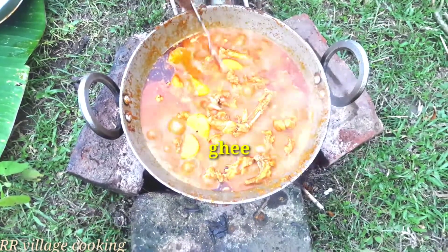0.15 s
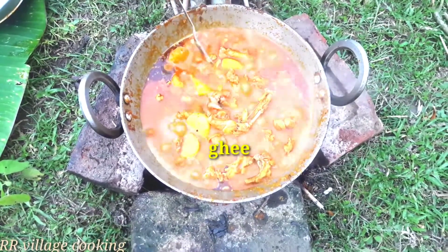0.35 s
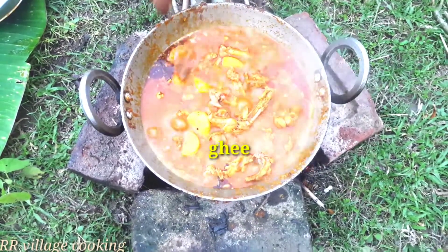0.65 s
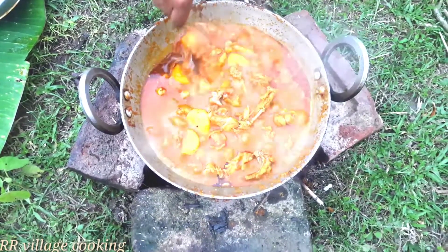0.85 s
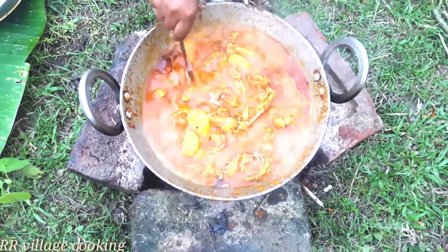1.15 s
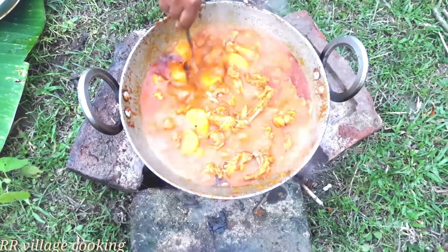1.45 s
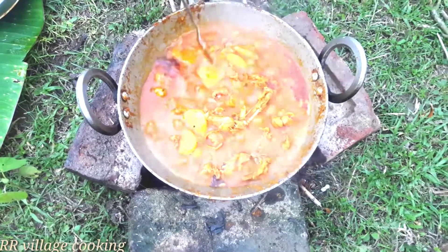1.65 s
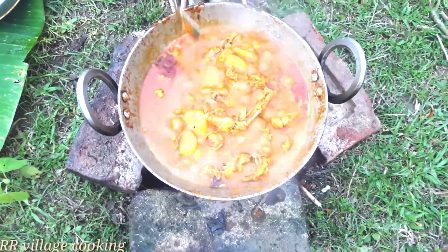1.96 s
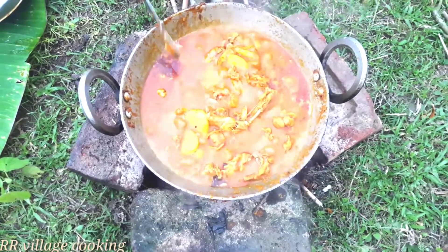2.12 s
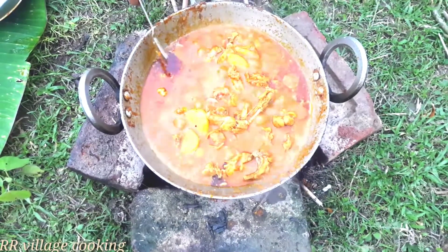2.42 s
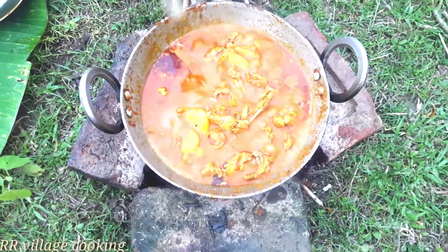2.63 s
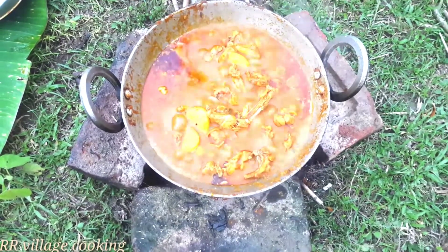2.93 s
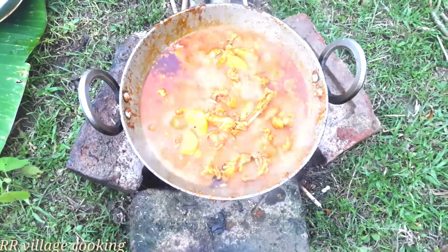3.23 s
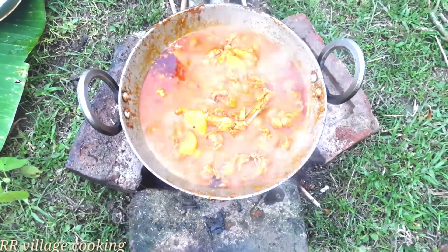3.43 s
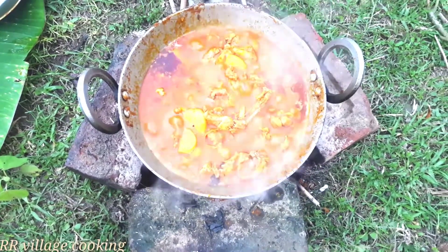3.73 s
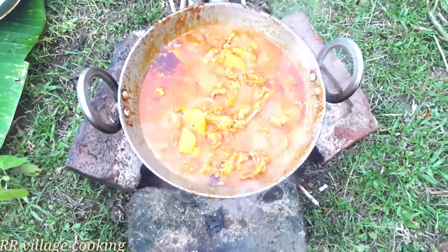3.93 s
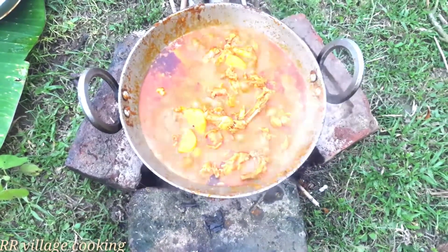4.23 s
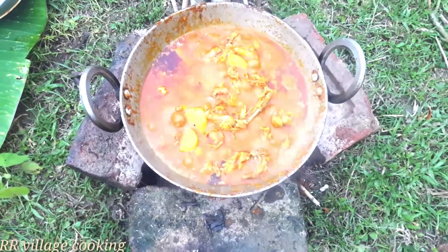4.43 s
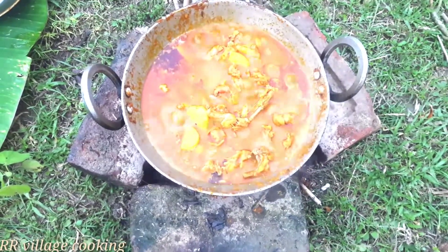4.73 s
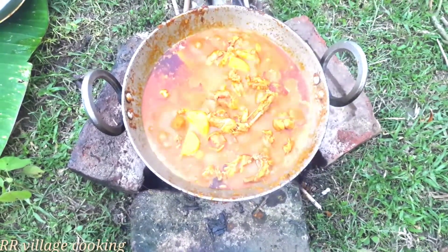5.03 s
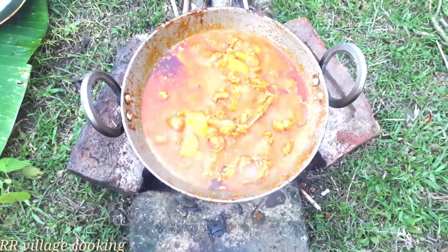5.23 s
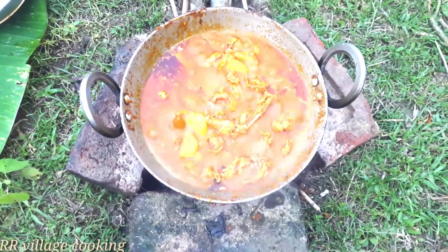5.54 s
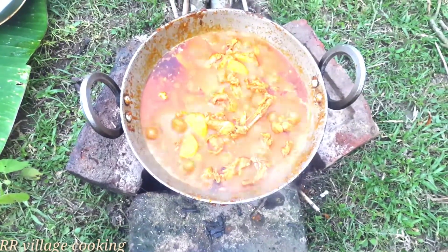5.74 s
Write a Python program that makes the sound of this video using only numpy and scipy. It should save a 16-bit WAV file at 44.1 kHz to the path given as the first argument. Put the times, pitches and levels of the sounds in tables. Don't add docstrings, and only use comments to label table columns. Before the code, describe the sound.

Close to a wide metal pan in an open yard, thick curry bubbles, plops and spits over a faint fire and distant engine drone, under dense cicada hiss. A light knock and bird chirps come first, then two hard spoon blows on the rim. The background abruptly sinks and slowly recovers; later a light knock and a tapped, scraped steel lid.

```python
import sys
import numpy as np
from scipy import signal
from scipy.fft import rfft, irfft, next_fast_len
from scipy.io import wavfile

SR = 44100
rng = np.random.default_rng(int(sys.argv[2]) if len(sys.argv) > 2 else 0)


def boost(x):
    u = np.asarray(x, float) / 20
    return 10 ** u


def generate_wav(signal):
    frames = np.transpose(np.atleast_2d(signal))
    scaled = np.clip(frames, -1, 1) * 32767
    pcm = np.round(scaled).astype(np.int16)
    wavfile.write(sys.argv[1], SR, pcm)


N = 258891

# t/s, gain/dB, boil/dB, finest films/dB
CONTROLS = [(0.0, -0.5, 1.5, -1), (1.0, -.5, 1.5, -1.5), (2.3, 0.5, 1.5, 1), (2.42, -2, 1, -4),
            (2.62, -5, 1.5, -10), (2.9, -10.5, -0.5, -21), (3.7, -9.5, -2, -20), (3.95, -4, -1.5, -11),
            (4.2, -2, 0, -8), (4.46, 0, -2, -4), (5.0, .5, -1.5, 2), (5.87, 0, -1, 2)]
# f/Hz, width/Hz, level/dB
CICADA = [(7520, 46, 0.5), (8530, 17, -0.5), (8540, 25, 6.5), (8680, 23, 1), (8910, 34, 2.5),
          (9230, 30, 3.5), (9240, 15, -3), (10500, 40, -8), (10700, 40, 1), (10730, 14, -7)]
# f/Hz, density/dB per Hz
CICADA_BODY = [(3820, -54.5), (6500, -27.5), (6960, -13.5), (7720, -4), (8360, 0), (8760, 4.5),
               (10200, -0.5), (11000, -0.5), (12500, -30.5), (16200, -50), (22000, -120)]
# f/Hz, width/Hz, level under the simmer/dB
KATYDIDS = [(5600, 970, -8.5), (6010, 700, -14.5)]
# f/Hz, density/dB per Hz
SIMMER = [(150, -21), (250, 0.5), (339, -5.5), (588, 6), (809, -8.5), (935, 0), (1200, -10.5), (2080, -9.5),
          (3820, -9), (5570, -14), (6630, -10), (8000, -13.5), (10400, -19), (17600, -120)]
# f/Hz, density/dB per Hz
RUMBLE = [(12, -22.5), (20, -16), (27, -22), (47, -18), (76, -9.5), (111, 1.5), (145, -2), (292, -12),
          (400, -20), (520, -49.5), (880, -120)]
# t/s, f/Hz
FIRING = [(0.0, 149.9), (0.77, 153.8), (1.7, 155.7), (2.45, 154.9), (3.91, 157.0), (4.79, 152.6),
          (5.71, 152.7), (5.87, 154.1)]
# order, level/dB
ENGINE = [(2, -19), (3, -14), (4, -4), (5, 0), (6, -9), (7, -16), (8, -15)]
# t/s, peak level/dB, f/Hz
BLOPS = [(0.031, -34, 640), (0.087, -39, 990), (0.19, -38.5, 587), (0.312, -29.5, 710), (0.642, -40, 643),
         (0.792, -38, 498), (0.853, -35, 958), (0.995, -34.5, 656), (1.139, -29.5, 620), (1.789, -32, 900),
         (2.01, -38.5, 680), (2.19, -33, 630), (2.229, -32.5, 744), (2.831, -44, 676), (3.061, -48.5, 613),
         (3.156, -45.5, 880), (3.681, -45.5, 573), (3.956, -41.5, 543), (4.168, -40, 580),
         (4.294, -33.5, 910), (4.374, -38, 625), (4.452, -35, 562), (4.48, -35, 965), (4.621, -40, 482),
         (5.073, -35, 890), (5.327, -33.5, 530), (5.419, -25.5, 615), (5.538, -36, 574),
         (5.806, -35.5, 571), (5.84, -36.5, 584)]
# t/s, peak level/dB, f/Hz
GURGLES = [(0.127, -43, 678), (0.251, -39.5, 650), (0.419, -43, 930), (0.502, -46, 565), (0.572, -42, 568),
           (0.809, -37, 479), (1.034, -45, 584), (1.053, -41, 751), (1.329, -46, 490), (1.373, -39, 496),
           (1.47, -41, 600), (1.542, -39, 493), (1.688, -50, 579), (1.844, -42, 565), (1.891, -46, 608),
           (2.165, -39, 547), (2.297, -43, 735), (2.342, -40, 1020), (2.369, -39, 576), (3.124, -52, 570),
           (3.493, -50, 676), (3.556, -50, 686), (3.619, -49, 560), (3.976, -47, 541), (4.331, -39.5, 982),
           (4.403, -42, 487), (4.535, -46, 560), (4.598, -41, 557), (4.667, -39, 937), (4.766, -35.5, 540),
           (4.831, -45, 468), (4.877, -38, 506), (4.894, -38, 470), (4.99, -40, 590), (5.036, -43, 509),
           (5.132, -42, 576), (5.483, -44, 966), (5.559, -39, 692), (5.61, -41, 643), (5.706, -39, 620)]
# t/s, peak level/dB, f/Hz
SPLATS = [(0.22, -36, 1340), (0.296, -35, 1570), (0.879, -31, 1100), (1.112, -35, 1240), (1.79, -32, 1490),
          (1.798, -25.5, 1230), (1.814, -37, 1400), (2.186, -29, 1025), (2.198, -36, 1900),
          (2.235, -37, 1850), (2.965, -42, 1800), (3.292, -40.5, 2360), (3.328, -45.5, 1476),
          (3.43, -49, 1110), (3.662, -43, 1270), (3.685, -45, 2100), (3.955, -42.5, 1350),
          (4.297, -38.5, 1870), (4.485, -39, 1880), (1.343, -39, 2000), (2.779, -49.5, 1790),
          (4.012, -44, 1890), (4.138, -44.5, 2300), (5.358, -42, 2120), (5.386, -41, 2000)]
# t/s, peak level/dB, f/Hz
LESSER_SPLATS = [(0.1281, -48, 2140), (0.3361, -44, 2400), (0.3661, -45, 1810), (0.6447, -41, 2360),
                 (0.7801, -39, 2400), (1.0635, -41, 1990), (1.4223, -43, 1410), (1.4895, -44, 1880),
                 (1.513, -42, 1870), (1.5824, -39, 2730), (1.6192, -44, 2380), (1.705, -37, 2460),
                 (1.7704, -46, 1440), (2.0477, -41, 2130), (2.6893, -48, 2400), (2.412, -38, 2050),
                 (4.6598, -44, 1510), (4.6785, -41, 2340), (4.9482, -45, 1530), (5.1522, -44, 1660),
                 (5.3168, -43, 2310), (5.5403, -44, 2480)]
# t/s, peak level/dB, f/Hz
SPITS = [(0.0307, -29.5, 4020), (0.1005, -32.5, 4500), (0.2224, -30, 3630), (0.3753, -32, 4300),
         (0.594, -33.5, 3850), (0.846, -32.5, 3900), (1.041, -30, 3650), (1.091, -33, 4030),
         (1.14, -31.5, 4760), (0.7525, -36, 3860), (1.3095, -35.5, 3430), (1.3742, -23, 4000),
         (1.92, -34, 4540), (1.5406, -31.5, 3720), (1.676, -33, 4040), (1.7215, -30.5, 3620),
         (1.8602, -31, 4130), (2.0088, -33.5, 3500), (2.2667, -32, 4200), (2.3665, -32, 3980),
         (2.412, -36, 3700), (3.207, -40, 4450), (3.3029, -35.5, 4050), (4.3275, -36, 3970),
         (4.5356, -34.5, 4270), (2.062, -37, 3500), (4.7493, -37, 3930), (4.927, -30.5, 4080),
         (1.9699, -39, 4000), (5.8, -35.5, 4270)]
# t/s, peak level/dB, f/Hz
LESSER_SPITS = [(0.0593, -43, 3370), (0.0772, -37.5, 3480), (0.159, -35, 3860), (0.2157, -38, 3450),
                (0.2468, -36, 4050), (0.2924, -35.5, 3470), (0.4005, -42, 4070), (0.4269, -41, 4080),
                (0.4449, -39, 3670), (0.4933, -41, 4520), (0.5521, -40, 3500), (0.5651, -37, 3280),
                (0.6434, -40, 3730), (0.6532, -35, 3940), (0.7088, -35.5, 4330), (0.723, -41, 3820),
                (0.7664, -37, 3990), (0.782, -37, 3460), (0.818, -35, 3950), (0.8904, -40, 4100),
                (0.9318, -37, 3570), (1.0251, -34, 3500), (1.07, -37, 4070), (1.2216, -36, 3800),
                (1.2434, -38, 3730), (1.4092, -38, 4020), (1.4296, -39, 4760), (1.4917, -39, 3220),
                (1.6013, -35, 4280), (1.32, -37, 4400), (1.748, -36, 3530), (1.7729, -39, 4520),
                (1.8048, -37, 4450), (2.0418, -44, 3770), (2.0852, -38, 4750), (2.139, -36, 3980),
                (2.1914, -35, 4480), (2.2856, -36, 3880), (2.3012, -36, 3630), (2.3356, -40, 3420),
                (4.1707, -43, 3360), (4.1946, -38.5, 3500), (4.267, -39, 4450), (4.3076, -38.5, 3750),
                (4.4124, -40, 4050), (4.4764, -42, 3700), (4.594, -38, 3870), (4.9586, -35, 4200),
                (5.0138, -35, 4270), (5.0514, -37, 4730), (5.1046, -38, 4080), (5.1263, -39, 3800),
                (5.1901, -39, 4280), (5.2071, -38, 3760), (5.2797, -39, 3620), (5.2986, -39, 3420),
                (5.3847, -42, 3670), (5.449, -39, 4420), (5.5513, -38, 3500), (5.5727, -45, 4220)]
# t/s, peak level/dB, f/Hz
FAINT_SPITS = [(2.548, -42, 4300), (2.558, -44, 3900), (2.7377, -50, 3830), (2.7781, -49, 3640),
               (2.8035, -56, 4120), (2.8739, -55, 3780), (2.9542, -49, 3740), (3.0061, -56, 3730),
               (3.0864, -53, 3560), (3.1577, -52, 4980), (3.2344, -56, 3410), (3.2544, -46, 3710),
               (3.3518, -48, 3450), (3.4012, -54, 3780), (3.4496, -51, 3450), (3.5414, -55, 3160),
               (3.6157, -53, 3850), (3.6544, -47, 3660), (3.7539, -43.5, 3520), (3.8142, -48, 4170),
               (3.8994, -44, 4420), (4.0297, -40, 4220), (4.4483, -42, 3700), (4.5743, -40, 4330),
               (5.533, -45, 3970), (5.6017, -40, 4500), (5.6256, -41, 4250), (5.6471, -37, 4340),
               (5.697, -36, 3800), (5.756, -40, 4440)]
# t/s, peak level/dB, f/Hz
TICKS = [(0.193, -35, 5540), (1.078, -33, 5600), (1.164, -32, 5780), (1.2735, -35, 5460),
         (1.514, -28, 5830), (2.18, -35, 5460), (2.258, -34, 5350), (4.1514, -42, 5650),
         (4.6239, -40, 5440), (4.6777, -37, 5960), (5.1415, -35, 5960), (5.171, -35, 5620)]
# t/s, length/s, f/Hz, level/dB
HEN = [
    (1.06, .23, 686, -62),
    (3.967, .38, 676, -66),
]
# harmonic, level/dB
HEN_THROAT = [
    [(1, 0), (3, 6.5), (3.75, -4)],
    [(1, -8), (3, 2.5), (4, 0), (5, -3)],
]
# t/s, peak level/dB, brightness/dB per octave, crack t60/s, ring level/dB
KNOCKS = [
    (1.3737, -18, -2.5, 0.009, -48),
    (2.4243, -3, 0.6, 0.0081, -23),
    (2.4277, -9, 0, .008, -50),
    (2.439, -27, -1, 0.02, -15),
    (2.5854, -5.5, 2, 0.0086, -19.5),
    (4.992, -19, 3, 0.009, -50),
    (4.994, -25, 0, 0.0066, -50),
]
# f/Hz, density/dB per Hz
CRACK = [(60, -30), (150, -14), (400, -9), (1000, -19.5), (2500, -9), (3300, -13), (4200, 4.5),
         (5600, -1.5), (7000, -7.5), (9000, -3), (11000, 2), (12600, -32), (14300, -22), (16000, -38)]
# f/Hz, level/dB, t60/s
PAN = [(1466, -14, 0.11), (1960, -12.5, 0.12), (2250, -17, .09), (2550, -10.5, 0.11), (3150, -5.5, 0.095),
       (4030, -1.5, 0.08), (4370, -5, 0.083), (4720, -12, 0.08), (5378, -12, 0.1), (5700, -10, 0.076),
       (6980, -6.5, 0.08), (10600, -9, 0.012), (11700, -7, 0.04), (14100, -14, .03)]
# t/s, length/s, centre f/Hz, level/dB
CHIRPS = [
    (1.792, 0.096, 2530, -41.5),
    (1.957, 0.038, 2380, -43),
]
# t/s, length/s, from f/Hz, to f/Hz, level/dB
WHISTLES = [
    (2.097, 0.049, 2570, 2365, -37.5),
    (2.134, 0.11, 2554, 2200, -45),
    (2.133, 0.046, 2270, 2120, -47),
    (2.287, 0.034, 1870, 2030, -49.5),
    (2.313, 0.04, 1837, 1766, -48),
    (2.335, 0.042, 2020, 2040, -58),
]
# f/Hz, level/dB
TIP = [(4100, -6), (7000, -12), (8600, -6), (10400, -1), (12000, -20)]
# t/s, level/dB
HARD_BLOWS = [
    (2.4244, 1),
    (2.5855, -1),
]
# f/Hz, first blow level/dB, second blow level/dB, t60/s
CLANK = [(260, -27, -29, 0.026), (520, -30, -31, .02), (14400, -21, -26, .009), (3040, -23.5, -29, 0.0093),
         (3760, -15.5, -17, 0.024), (4020, -15, -17, 0.014), (4270, -21, -12, 0.025),
         (4360, -10, -12.5, 0.02), (4770, -13.5, -12.5, 0.02), (5120, -12, -13.5, .014),
         (5580, -8.5, -10.5, 0.021), (6320, -14, -14, 0.012), (7400, -19.5, -20, 0.013),
         (10700, -17, -15, .01), (11660, -27, -21.5, 0.03)]
# f/Hz, first blow level/dB, second blow level/dB, t60/s
THUMP = (112, -38, -40, 0.08)
# f/Hz, struck level/dB, rubbed level/dB, t60/s
LID = [(1812, 0.5, -8, 0.026), (2030, -5, -10, 0.022), (3800, -1, -15, 0.061), (4960, -25, -41, .03),
       (6300, 2, -19, 0.065), (8200, -27, -15, 0.087), (8750, 8, -8, 0.058), (9400, 0, -27, 0.097),
       (10460, 6.5, -32, 0.074), (11720, 5.5, -13, 0.066), (12800, -19, -30, .04), (14400, -10, -12, 0.076),
       (15500, -6, -16, .08)]
# t/s, level/dB
LID_HITS = [
    (4.768, -30.5),
    (4.772, -43),
    (4.779, -45),
    (4.791, -38),
    (4.807, -43),
    (4.838, -49),
    (4.856, -49),
    (4.889, -51),
    (4.897, -50),
]
# t/s, length/s, peak at share, level/dB
SCRAPES = [
    (4.762, 0.087, 0.099, -48),
    (4.831, 0.087, 0.31, -47),
]
# t/s, length/s, peak at share, f/Hz, level/dB
SQUEALS = [
    (4.838, 0.047, 0.45, 4324, -20),
    (4.888, 0.047, .15, 4330, -41.5),
    (4.84, 0.034, .4, 5000, -40),
    (4.839, 0.026, .3, 7610, -33),
    (4.866, 0.018, .15, 7610, -22),
    (4.89, 0.025, 0.27, 7610, -34.5),
    (4.839, .04, .2, 8100, -32.5),
    (4.884, 0.016, .4, 8040, -29),
    (4.87, 0.036, .4, 8490, -37),
]

CICADA_DB, SIMMER_DB, DRONE_DB, CRACKLE_DB = -44.5, -52.5, -51, -66


def in_time(rows):
    s, *columns = np.transpose(rows)
    return [np.interp(np.arange(N) / SR, s, c) for c in columns]


def rms_one(x):
    return x / np.sqrt(np.mean(x ** 2) + 1e-20)


def drift(rate_hz):
    r = np.exp(-80 * np.pi * rate_hz / SR)
    white = rng.standard_normal(N // 40 + 2002)
    slow = signal.lfilter([1], [1, -2 * r, r * r], white)[2000:]
    return np.interp(np.arange(N) / 40, np.arange(len(slow)), rms_one(slow))


def ring(clicks, hz, t60):
    r, w = boost(-60 / (t60 * SR)), 2 * np.pi * hz / SR
    return signal.lfilter([0, np.sin(w)], [1, -2 * r * np.cos(w), r * r], clicks + 1e-18)


def coloured(x, spectrum):
    size = next_fast_len(len(x) + 4096)
    hz, level_db = np.transpose(spectrum)
    grid = np.arange(size // 2 + 1) * SR / size + 1
    cepstrum = irfft(np.log(boost(np.interp(np.log(grid), np.log(hz), level_db))), size)
    cepstrum[1:size // 2] *= 2
    cepstrum[size // 2 + 1:] = 0
    return rms_one(irfft(rfft(x, size) * np.exp(rfft(cepstrum)), size)[:len(x)])


def tone(hz):
    return 2 * np.pi * np.cumsum(hz) / SR


def swell(start, length, peak, fullness):
    u = np.clip((np.arange(N) / SR - start) / length, 0, 1)
    peak = np.clip(peak, .05, .95)
    return u, np.sin(np.pi / 2 * np.minimum(u / peak, (1 - u) / (1 - peak))) ** fullness


def add(out, s, sound):
    i = int(s * SR) + 20
    out[i:i + len(sound)] += sound[:N - i]


def cicadas():
    hiss = coloured(rng.standard_normal(N) * boost(1.33 * drift(140)), CICADA_BODY)
    white = rng.standard_normal(N)
    singers = sum(boost(level_db + 2.5 * drift(8)) * rms_one(ring(white, hz, 2.2 / width))
                  for hz, width, level_db in CICADA)
    return rms_one(hiss + boost(-6) * rms_one(singers))


def katydids():
    white = rng.standard_normal(N)
    out = np.zeros(N)
    for hz, width, level_db in KATYDIDS:
        t60 = 3.5 / width
        band = ring(ring(white, hz, t60), hz, t60)
        out += boost(level_db + 2.6 * drift(4.6)) * rms_one(band)
    return out


def grains(per_s, low_hz, high_hz, cycles, spread_db):
    tear_s = .0006
    born = rng.random(N) < per_s / SR
    sizes = born * boost(spread_db * np.minimum(rng.exponential(1, N), 4))
    tearing = signal.lfilter([1], [1, -np.exp(-1 / (tear_s * SR))], sizes + 1e-18) * rng.standard_normal(N)
    latest = np.maximum.accumulate(born * np.arange(N))
    dealt = rng.integers(0, 16, N)[latest]
    pitches = np.geomspace(low_hz, high_hz, 16)
    return rms_one(sum(ring(tearing * (dealt == k), hz, cycles / hz) for k, hz in enumerate(pitches)))


def simmer(gain_db):
    wash_sinks = 0.23
    wash = coloured(rng.standard_normal(N) * boost(1.5 * drift(30)), SIMMER)
    spits = boost(-3.5) * grains(300, 3200, 6000, 11.0, spread_db=3.2)
    splats = boost(-11) * grains(150, 1100, 3200, 8.0, spread_db=2.6)
    gurgles = boost(-7.5) * grains(170, 446, 1185, 9.3, spread_db=2.0)
    return boost(-3.5 + wash_sinks * gain_db) * wash + spits + splats + gurgles


def drone():
    [fifth_hz] = in_time(FIRING)
    phase = tone(fifth_hz / 5 * (1 + 0.0017 * drift(2.1)))
    orders = sum(boost(level_db + 0.93 * drift(2.7)) * np.sin(k * phase + k * k) for k, level_db in ENGINE)
    rumble = coloured(rng.standard_normal(N) * boost(1.2 * drift(6)), RUMBLE)
    return rms_one(rumble + boost(1.0) * rms_one(orders))


def crackle():
    top = signal.butter(3, [11800, 15900], "band", fs=SR, output="sos")
    tears = (rng.random(N) < 170 / SR) * boost(4.5 * np.minimum(rng.exponential(1, N), 4))
    tears = signal.lfilter([1], [1, -.96], tears) * rng.standard_normal(N)
    return rms_one(signal.sosfilt(top, rng.standard_normal(N) + boost(8) * rms_one(tears)))


def bubble(hz, t60, rise):
    t = np.arange(int(t60 * SR) + 8) / SR
    onset = 1 - np.exp(-t * hz * 1.6)
    return np.sin(tone(hz * (1 + rise * t / t60))) * boost(-60 * t / t60) * onset


def bursts():
    out = np.zeros(N)
    large = BLOPS + SPLATS + GURGLES + LESSER_SPLATS
    for (s, peak_db, hz), luck in zip(large, rng.random((len(large), 2))):
        add(out, s, boost(peak_db + 2.0) * bubble(hz, 7.4 / hz + 0.01, rise=0.12))
        add(out, s, boost(peak_db - 11.0) * bubble(hz * (1.19 + luck[0]), 20.0 / hz, rise=0.81))
        add(out, s, boost(peak_db - 21) * bubble(hz * (2.6 + 1.5 * luck[1]), 0.002, rise=.3))
    small = SPITS + TICKS + LESSER_SPITS + FAINT_SPITS
    for (s, peak_db, hz), luck in zip(small, rng.random((len(small), 2))):
        add(out, s, boost(peak_db + 0.5) * bubble(hz, 30.0 / hz, rise=0.11))
        add(out, s, boost(peak_db - 0.5) * bubble(hz * (1.066 + 0.4 * luck[0]), 22.0 / hz, rise=0.077))
        tick_db = peak_db - 18 - 9 * luck[1]
        add(out, s, boost(tick_db) * bubble(13200 + 1800 * luck[0], 0.0018, rise=.02))
    return out


def hen():
    arch = 0.031
    out = np.zeros(N)
    for (s, length, hz, level_db), throat in zip(HEN, HEN_THROAT):
        u, shape = swell(s, length, peak=0.23, fullness=0.34)
        phase = tone(hz * (1 + arch * (np.sin(np.pi * u) - 1) + 0.005 * drift(15.1)))
        voice = sum(boost(part_db + 2.6 * drift(25)) * np.sin(k * phase) for k, part_db in throat)
        out += shape * boost(level_db) * voice
    return out


def knocks():
    weight_hz, weight_growth = 500, 0.396
    light_flatter = 0.018
    yard_db, yard_colour = -16, 0.74
    echo_s = 0.023
    out = np.zeros(N)
    t = np.arange(int(.2 * SR)) / SR
    click = 1. * (t == 0)
    for s, peak_db, tilt_db, t60, ring_db in KNOCKS:
        noise, mode_luck = rng.standard_normal(len(t)), rng.standard_normal(len(PAN))
        tilted = []
        for hz, level_db in CRACK:
            colour_db = level_db * (1 + light_flatter * peak_db) + tilt_db * np.log2(hz / 4000)
            tilted.append((hz, colour_db + weight_growth * peak_db * (hz < weight_hz)))
        crack = coloured(noise * (boost(-60 * t / t60) + boost(-15 - 20 * t / t60)), tilted)
        scatter = signal.lfilter([.6], [1, -.4], noise[::-1])
        scatter = scatter * boost(-60 * t / 0.16) * (1 - np.exp(-(t / echo_s) ** 2))
        crack += boost(yard_db) * coloured(scatter, [(hz, yard_colour * level_db) for hz, level_db in tilted])
        strike = click + .04 * noise * boost(-60 * t / .07)
        modes = np.zeros(len(t))
        for (hz, mode_db, mode_t60), luck in zip(PAN, mode_luck):
            height = boost(mode_db + 3.1 * luck + tilt_db * np.log2(hz / 4000)) / 2
            for split in (.993, 1.002, 1.011):
                modes += height * ring(strike, hz * split, 0.75 * mode_t60)
        add(out, s, boost(peak_db) * (crack / np.abs(crack).max() + boost(ring_db) * modes))
    return out


def bird():
    trees_s, trees_db = 0.1, -9
    out = np.zeros(N)
    for s, length, hz, level_db in CHIRPS:
        u, shape = swell(s, length, peak=.5, fullness=2.0)
        phase = tone(np.full(N, hz))
        trill = np.sin(phase) * drift(270) + np.cos(phase) * drift(270)
        out += shape * boost(level_db) * rms_one(trill)
    flutter, waver = drift(70), drift(90)
    for s, length, from_hz, to_hz, level_db in WHISTLES:
        u, shape = swell(s, length, peak=0.34, fullness=0.26)
        glide_hz = from_hz + (to_hz - from_hz) * u + 20 * waver
        out += shape * boost(level_db + 3 + 3.5 * flutter) * np.sin(tone(glide_hz))
    t = np.arange(int(trees_s * SR)) / SR
    scatter = rng.standard_normal(len(t)) * boost(-60 * t / trees_s) * t
    return out + boost(trees_db) * signal.fftconvolve(out, scatter / np.linalg.norm(scatter))[:N]


def clank():
    tip_s, tip_t60_s, tip_rise_s = 2.3868, .0055, .0012
    out = np.zeros(N)
    click = 1. * (np.arange(int(.06 * SR)) == 0)
    rise = 1 - np.exp(-(np.arange(len(click)) / (tip_rise_s * SR)) ** 2)
    add(out, tip_s, rise * sum(boost(level_db) * ring(click, hz, tip_t60_s) for hz, level_db in TIP))
    for blow, (s, peak_db) in enumerate(HARD_BLOWS):
        for k, (hz, *level_db, t60) in enumerate(CLANK + [THUMP]):
            partner_hz = hz * rng.uniform(1.02, 1.05)
            pair = ring(click, hz, .8 * t60) + .6 * ring(click, partner_hz, .55 * t60)
            add(out, s, (-1) ** k * boost(peak_db + level_db[blow]) * pair)
    return out


def lid():
    taps = np.zeros(N)
    for s, level_db in LID_HITS:
        add(taps, s, boost(level_db - 19.5) * rng.standard_normal(88) * np.hanning(88))
    pressure = sum(boost(level_db) * swell(s, length, peak, 0.99)[1] for s, length, peak, level_db in SCRAPES)
    friction = boost(-11.5 + 3.2 * drift(99)) * pressure * rng.standard_normal(N)
    contact = signal.butter(3, [2600, 11500], "band", fs=SR, output="sos")
    out = boost(16.5) * signal.sosfilt(contact, 1.5 * taps + friction)
    for hz, hit_db, rub_db, t60 in LID:
        for split in (.988, 1.012):
            out += ring(boost(hit_db) * taps + boost(rub_db) * friction, hz * split, t60)
    flutter, waver = drift(120), drift(80)
    for s, length, peak, hz, level_db in SQUEALS:
        shape = swell(s, length, peak, 0.62)[1]
        shift = int(hz)
        height = boost(level_db + hz / 3000 * np.roll(flutter, shift))
        out += shape * height * np.sin(tone(hz * (1 + .005 * np.roll(waver, shift))))
    no_bass = signal.butter(3, 1350, "high", fs=SR, output="sos")
    return signal.sosfilt(no_bass, out)


def scene():
    simmer_sinks, drone_sinks = 1.025, 0.92
    gain_db, boil_db, films_db = in_time(CONTROLS)
    bed = boost(CICADA_DB + gain_db) * cicadas()
    bed += boost(SIMMER_DB + gain_db) * katydids()
    bed += boost(SIMMER_DB + simmer_sinks * gain_db + boil_db) * simmer(gain_db)
    bed += boost(DRONE_DB + drone_sinks * gain_db) * drone()
    bed += boost(CRACKLE_DB + films_db) * crackle()
    blows = signal.sosfilt(signal.butter(2, 90, "high", fs=SR, output="sos"), knocks())
    treble_limit = signal.ellip(10, .5, 60, 15650, fs=SR, output="sos")
    quiet = signal.sosfilt(treble_limit, bed + bursts() + blows + lid())
    return (quiet + hen() + bird() + clank())[None]


def band_limit(x):
    return signal.sosfilt(signal.butter(12, 16820, fs=SR, output="sos"), x)


def record(dry):
    rounded = 1.05 * np.tanh(dry / 1.05)
    finished = signal.sosfilt(signal.ellip(8, .5, 60, 16500, fs=SR, output="sos"), rounded)
    return band_limit(finished)


dry = scene()
out = record(dry)
generate_wav(out)
```